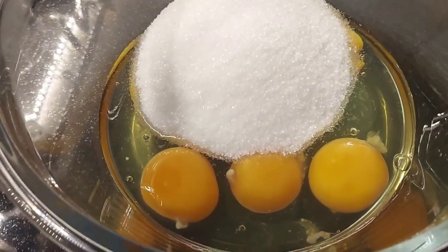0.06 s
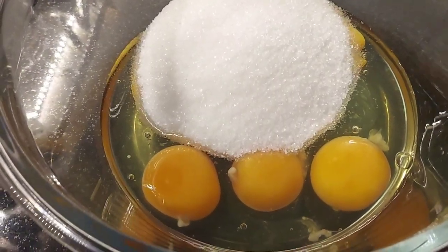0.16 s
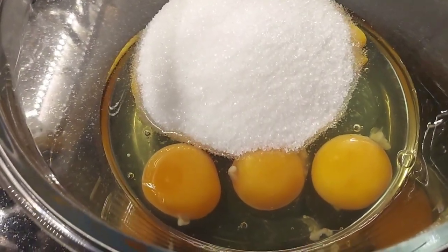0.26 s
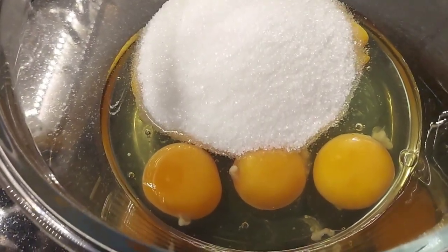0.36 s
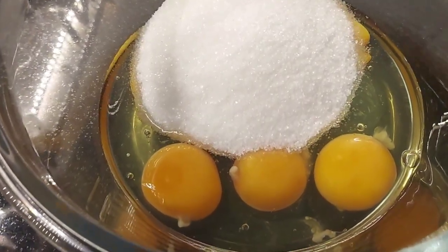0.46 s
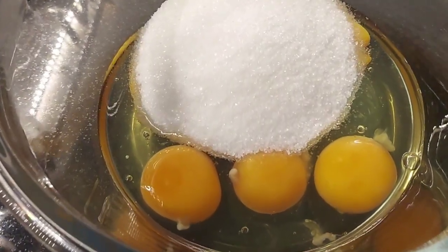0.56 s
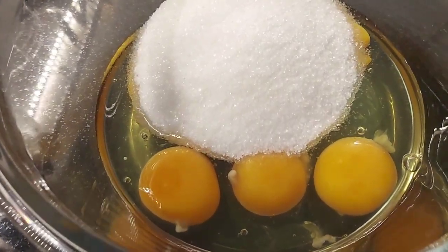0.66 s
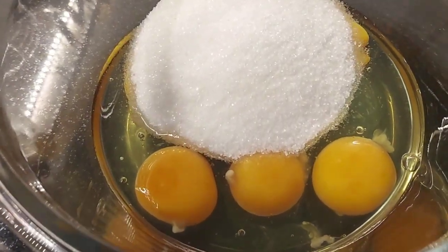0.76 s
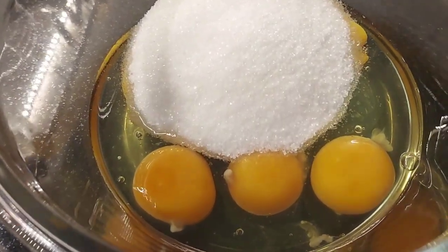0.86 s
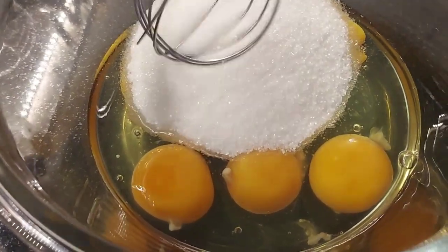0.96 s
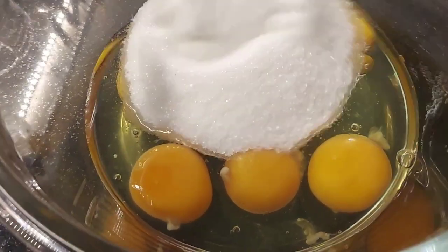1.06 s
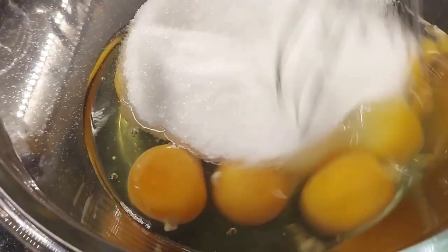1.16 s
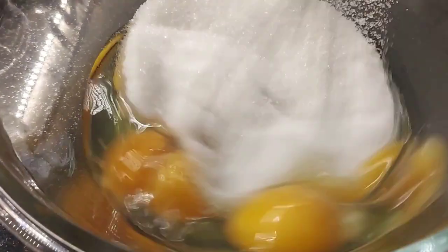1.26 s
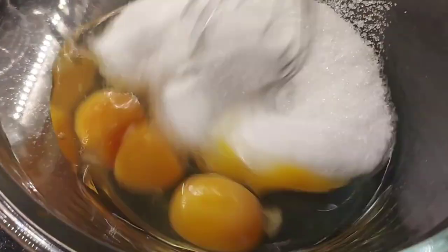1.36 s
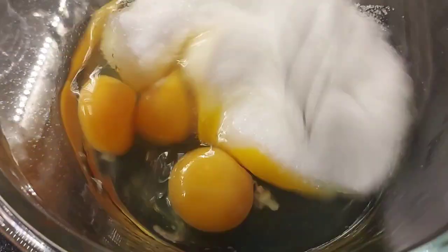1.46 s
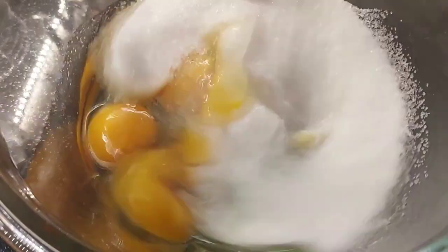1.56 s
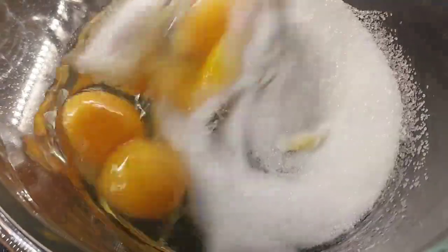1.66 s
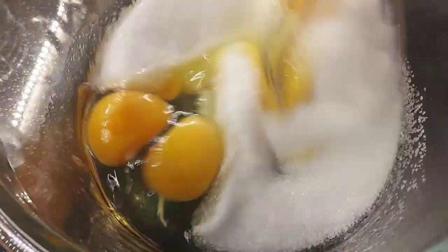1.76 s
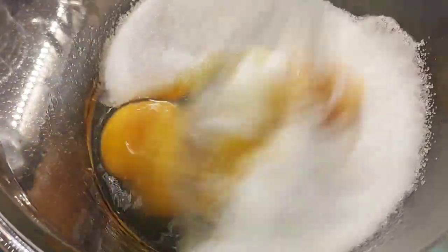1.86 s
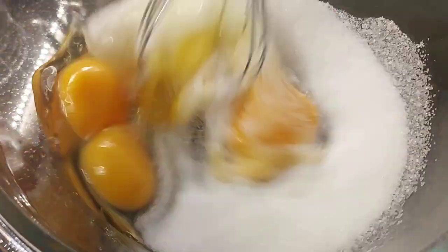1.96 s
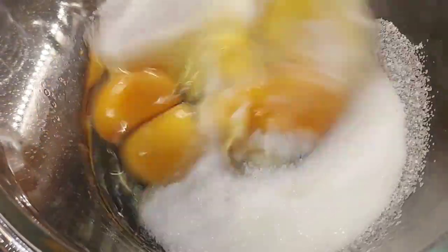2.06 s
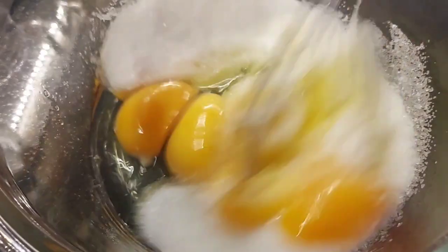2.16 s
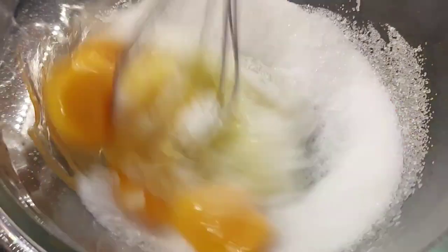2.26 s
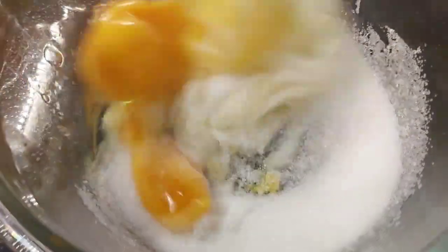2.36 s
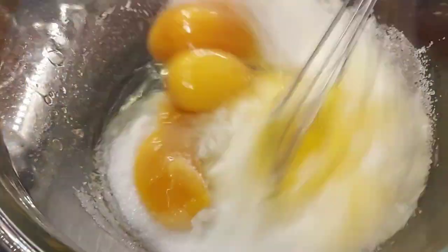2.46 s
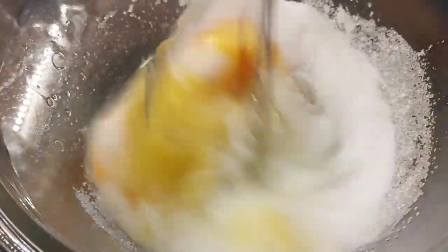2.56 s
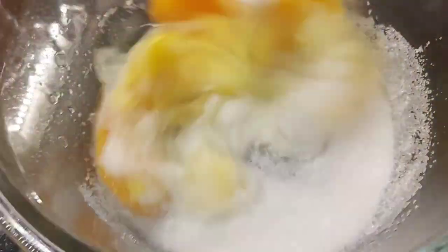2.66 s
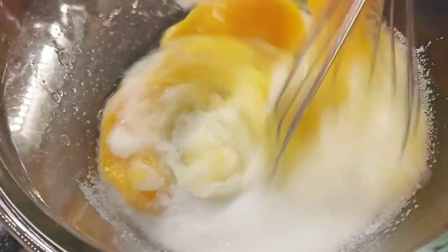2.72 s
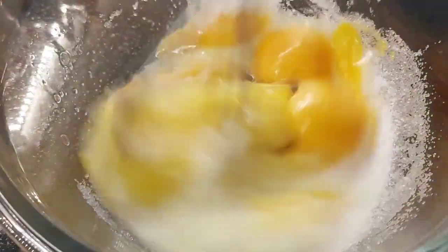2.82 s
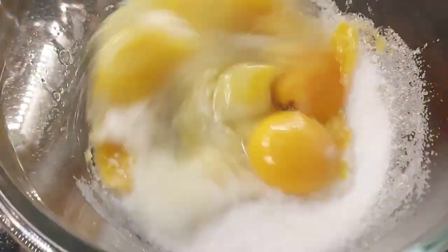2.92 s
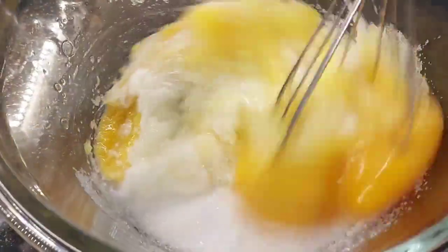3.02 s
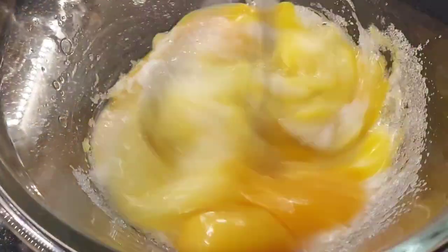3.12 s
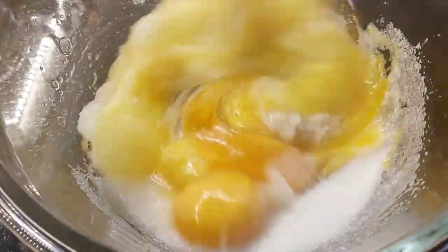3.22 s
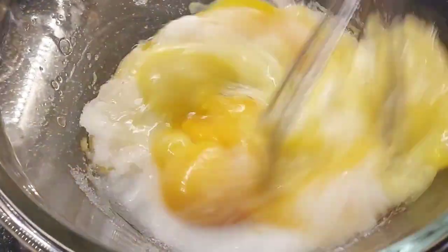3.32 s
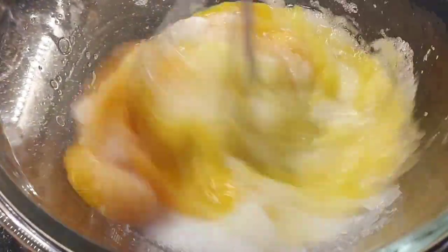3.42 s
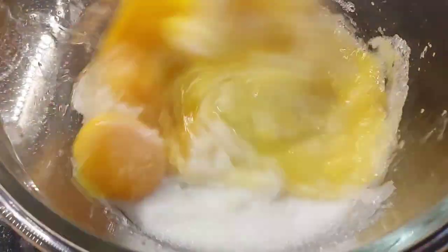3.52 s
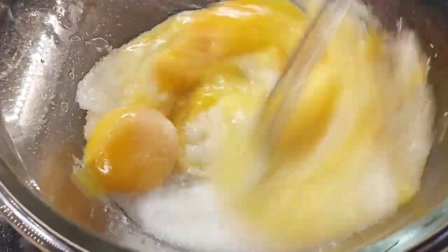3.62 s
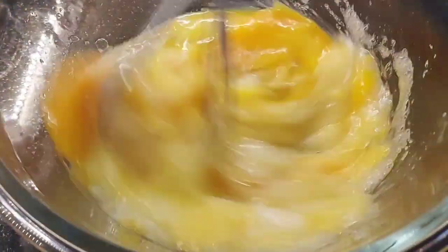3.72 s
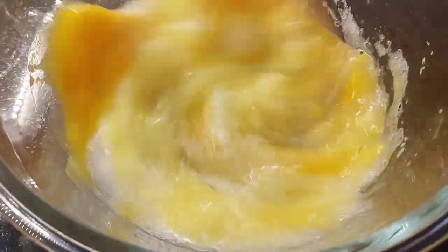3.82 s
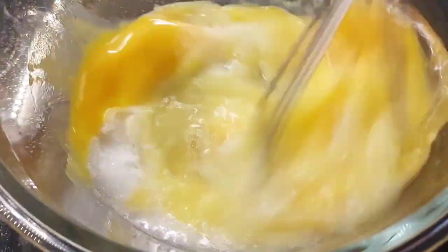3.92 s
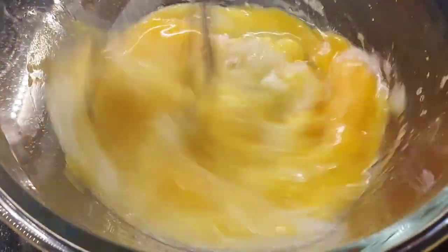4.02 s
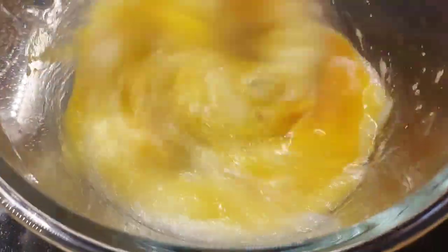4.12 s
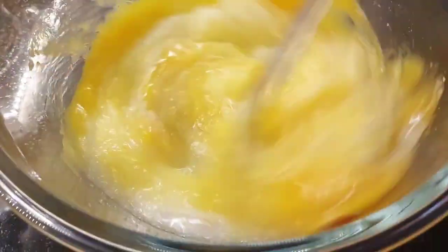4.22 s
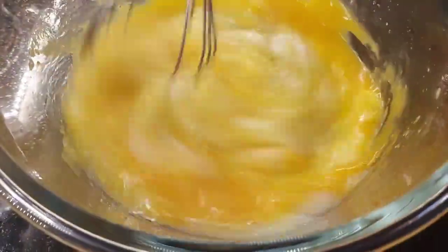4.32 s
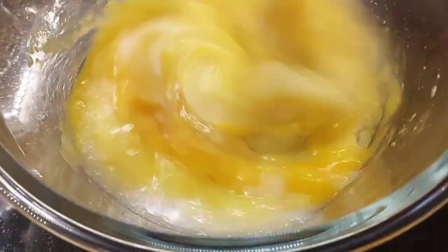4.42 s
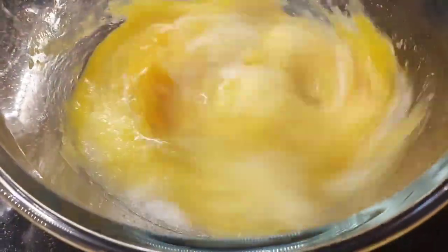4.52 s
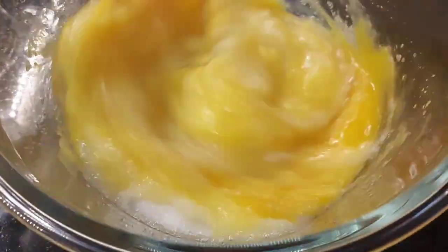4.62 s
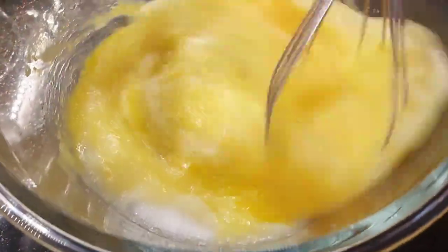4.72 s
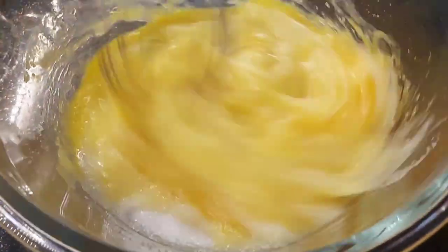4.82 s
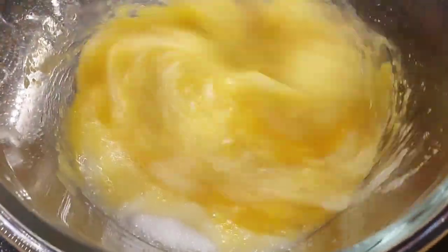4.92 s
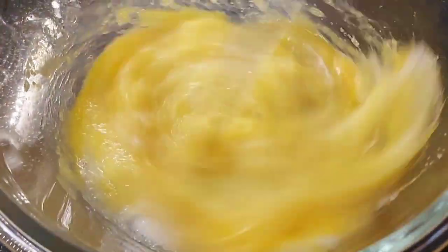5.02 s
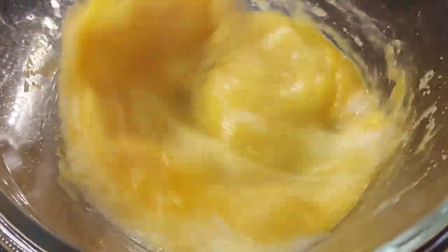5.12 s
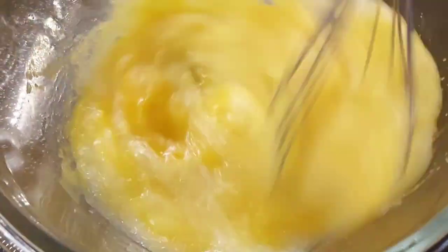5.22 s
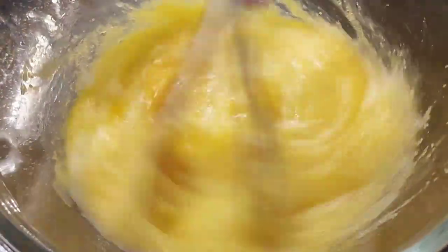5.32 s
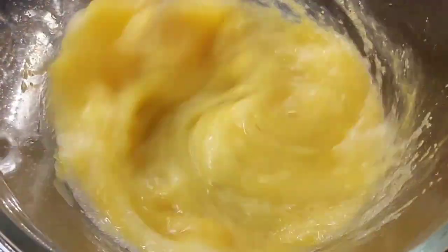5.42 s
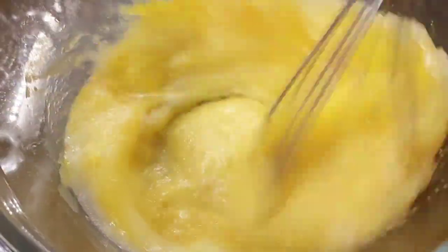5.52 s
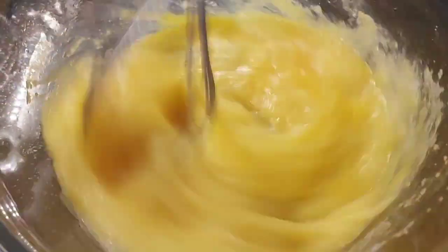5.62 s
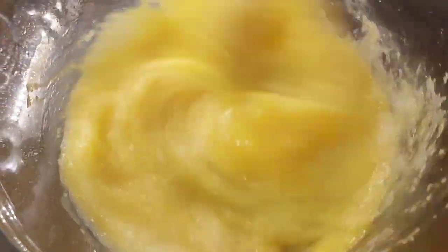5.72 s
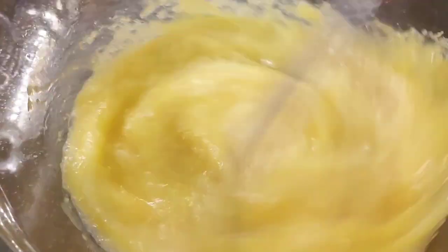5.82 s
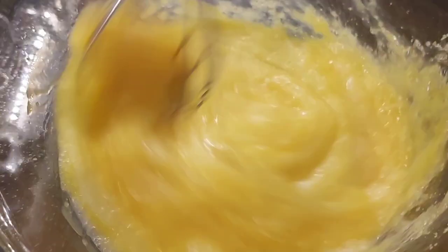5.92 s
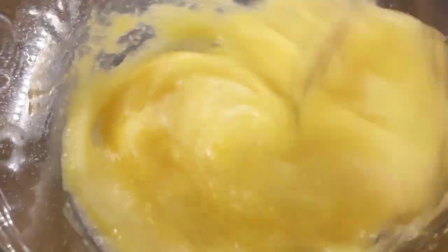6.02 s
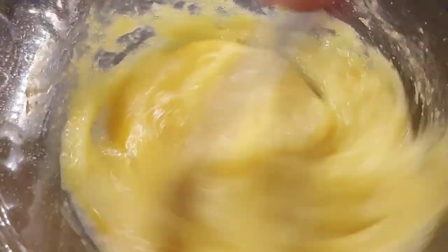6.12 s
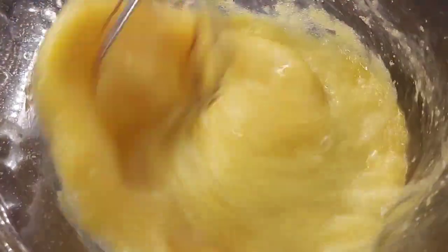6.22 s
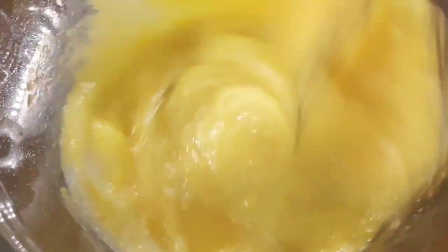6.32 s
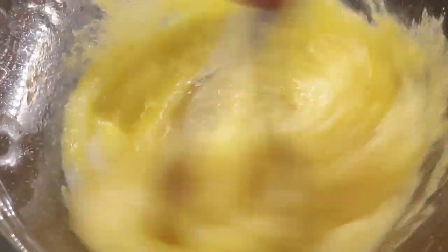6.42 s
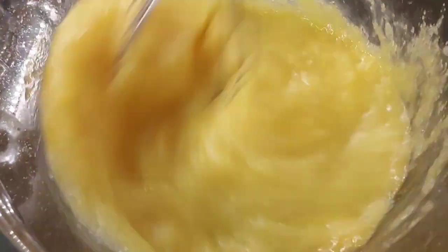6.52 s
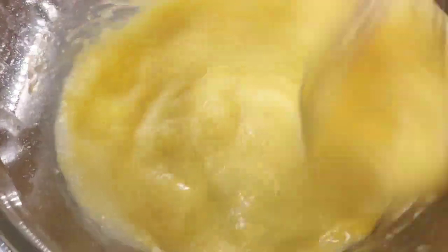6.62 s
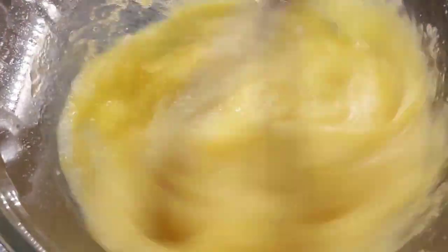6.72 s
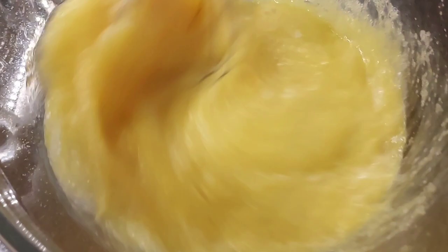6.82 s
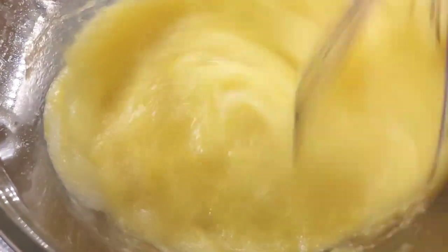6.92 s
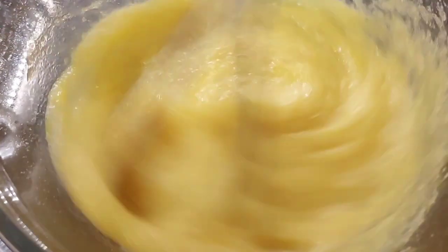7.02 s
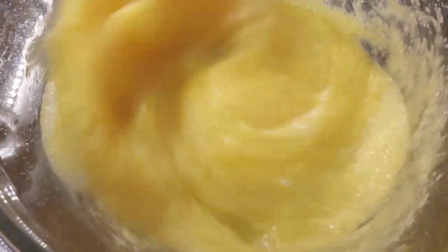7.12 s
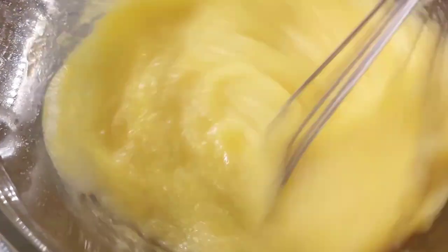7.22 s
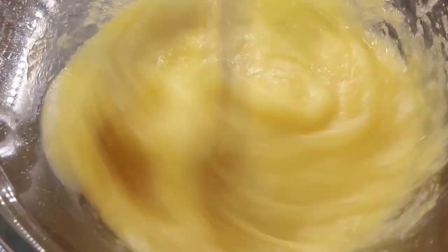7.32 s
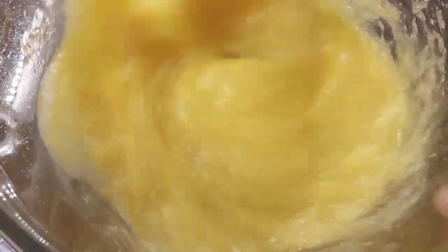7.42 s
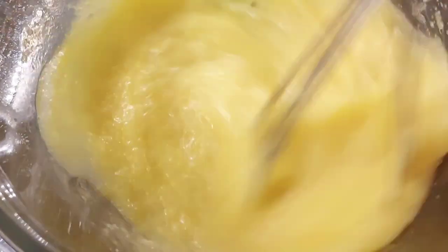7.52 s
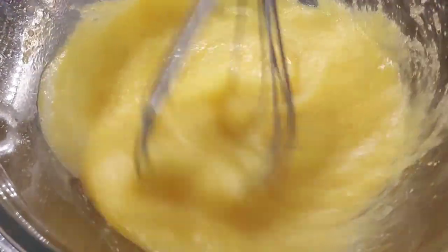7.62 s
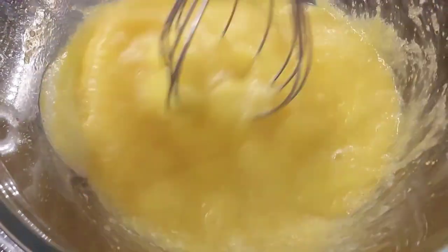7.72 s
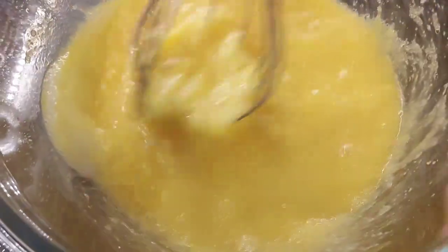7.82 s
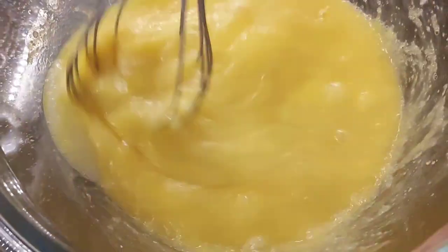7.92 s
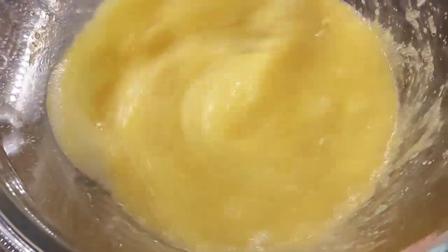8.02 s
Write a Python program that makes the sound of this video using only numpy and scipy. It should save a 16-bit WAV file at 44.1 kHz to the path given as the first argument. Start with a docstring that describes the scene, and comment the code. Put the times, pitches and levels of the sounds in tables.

```python
"""Kitchen counter: a wire whisk beats eggs and sugar in a thick glass bowl, close to a spaced pair of microphones.
Random grain contacts, swelling with each sweep, give the grind; short decaying bursts of them give the wire clatter.
Resonators and decaying tones ring the bowl; dry sugar hisses as filtered noise; short upward-gliding tones give
pops, thuds and snaps in the bowl. Low noise bands and tones shake the counter; a diffuse noise tail and quiet
coloured noise make the room."""
import sys
import numpy as np
from scipy import signal
from scipy.fft import rfft, irfft
from scipy.io import wavfile

SR = 44100
rng = np.random.default_rng(int(sys.argv[2]) if len(sys.argv) > 2 else 0)


def store_pcm(level_fs):
    """Save levels as 16-bit WAV."""
    pcm = np.round(np.clip(level_fs, -1, 1) * 32767).astype(np.int16)
    wavfile.write(sys.argv[1], SR, np.atleast_2d(pcm).T)


def linear_from_db(decibels):
    """Turn decibels (scalar or array-like) into linear amplitude factors; 0 gives 1."""
    return 10 ** (np.asarray(decibels, float) / 20)


N = 355887  # samples

# wires meeting the wall, before the offsets below: start_s, level_1200_5000hz_db, level_above_db,
# t60_s (held to 0.005-0.25), ring_re_mid_db
CLATTER = [(0.4, -54.5, -61, 0.03, -5), (1.126, -57, -40, 0.036, -7), (1.142, -44, -40, 0.062, 7),
           (1.186, -37.5, -31, 0.1, 4), (1.214, -36.5, -33, 0.02, -2), (1.5896, -33.5, -31, 0.093, 1.5),
           (1.675, -35.5, -40, 0.053, -19), (1.8996, -33.5, -42, 0.049, -3.5),
           (1.9065, -28.5, -31.5, 0.03, -8), (2.274, -30, -31.5, 0.051, -7),
           (2.356, -32.5, -32.5, 0.012, -6), (2.4809, -37.5, -30, 0.039, 6),
           (2.518, -30.5, -31, 0.042, -2.5), (2.561, -40, -43, 0.043, 1.5), (2.605, -38, -36.5, 0.031, 4),
           (2.7913, -31, -38, 0.05, -5.5), (2.894, -25.5, -26.5, 0.044, 2.5),
           (3.002, -23.5, -33, 0.018, -31), (3.0396, -37, -34.5, 0.11, -25), (3.356, -39.5, -39, 0.058, 5),
           (3.368, -28, -24, 0.014, -8), (3.38, -23.5, -30.5, 0.028, -13),
           (3.571, -26.5, -31.5, 0.027, -14), (3.596, -37, -38.5, 0.027, -4),
           (3.675, -23.5, -26.5, 0.057, -11), (3.695, -31.5, -34, 0.021, -2), (3.9468, -28, -32, 0.021, -2),
           (4.008, -24.5, -25, 0.08, -5), (4.156, -44.5, -35, 0.016, -14), (4.2099, -29, -32, 0.012, -14),
           (4.237, -30, -36, 0.064, -9), (4.259, -26, -30, 0.014, -19), (4.2846, -21.5, -22, 0.046, -11),
           (4.3223, -34.5, -38, 0.031, -7), (4.495, -33, -46.5, 0.028, -8.5), (4.509, -30, -32.5, 0.073, 1),
           (4.5438, -27.5, -35, 0.047, -4), (4.5645, -27.5, -26.5, 0.11, 5),
           (4.702, -29.5, -34, 0.071, -12), (4.7355, -33, -34, 0.2, -5.5), (4.7721, -27, -33.5, 0.051, 2),
           (4.811, -29, -29.5, 0.061, -8), (4.8235, -24.5, -33, 0.051, 0), (4.83, -24, -21, 0.041, -1.5),
           (4.958, -25, -35, 0.026, -7.5), (4.9734, -27.5, -26.5, 0.042, 1),
           (4.9833, -24.5, -24, 0.057, 2.5), (5.0118, -29, -34, 0.095, -1),
           (5.056, -16.5, -22, 0.026, -2.5), (5.0677, -23.5, -28, 0.055, 1.5), (5.073, -31, -26, 0.04, -12),
           (5.1656, -49, -35, 0.014, -6.5), (5.205, -27, -34, 0.02, -4), (5.2111, -15, -21.5, 0.021, -13),
           (5.2299, -25, -22.5, 0.053, 2), (5.2593, -20.5, -41, 0.015, -14),
           (5.2776, -45, -24.5, 0.015, -7), (5.2975, -26, -30, 0.029, -4), (5.3309, -28.5, -23, 0.059, 1.5),
           (5.362, -27, -31, 0.024, -2), (5.552, -31.5, -35, 0.026, -4), (5.5605, -31, -36, 0.015, -3),
           (5.573, -29.5, -29, 0.015, -8.5), (5.586, -27.5, -34, 0.012, -11),
           (5.6008, -17, -20.5, 0.055, 1), (5.6112, -21.5, -20, 0.031, 0.5), (5.657, -32, -32, 0.03, -11),
           (5.718, -41, -36, 0.026, -2), (5.776, -35.5, -32.5, 0.021, -7),
           (5.7991, -26.5, -25.5, 0.014, -13), (5.822, -24, -25, 0.018, -6), (5.8645, -26, -33, 0.031, -15),
           (5.8768, -23, -18, 0.022, -3.5), (5.883, -17.5, -16.5, 0.029, -7.5),
           (6.0104, -40, -40, 0.086, 4), (6.0661, -32, -43, 0.0098, -3), (6.08, -29, -32.5, 0.026, -9),
           (6.104, -45, -37, 0.02, -8), (6.123, -27, -38, 0.015, 0), (6.1327, -25.5, -48, 0.0044, 3),
           (6.1406, -24, -19.5, 0.078, 3), (6.2147, -33, -34.5, 0.028, 0), (6.266, -40, -45, 0.047, 2),
           (6.308, -43.5, -41, 0.027, 7), (6.362, -37, -31, 0.033, -12), (6.3683, -22.5, -34, 0.02, -2),
           (6.425, -14, -22, 0.028, -7), (6.4315, -18, -22.5, 0.08, -5), (6.4918, -25.5, -25.5, 0.047, -5),
           (6.541, -35, -34, 0.021, 3), (6.668, -31.5, -36, 0.023, -3), (6.6911, -28.5, -32.5, 0.032, -7),
           (6.7254, -24, -20, 0.017, -1), (6.7347, -27, -39, 0.022, -3), (6.7516, -23, -21.5, 0.032, 3),
           (6.8043, -29, -30.5, 0.044, -7), (6.873, -40, -37, 0.047, 4), (6.9906, -35, -34.5, 0.025, -5),
           (7.007, -25.5, -30.5, 0.032, -6), (7.0232, -29, -30, 0.14, 5), (7.145, -37.5, -48, 0.037, -3),
           (7.1622, -29, -34, 0.026, -1.5), (7.22, -27.5, -33.5, 0.04, -14), (7.24, -24.5, -30.5, 0.029, 2),
           (7.2603, -25.5, -34, 0.041, 2), (7.274, -32, -27, 0.014, -6), (7.295, -32.5, -34, 0.05, -12),
           (7.314, -19, -21.5, 0.072, -0.5), (7.448, -29, -32, 0.029, -9), (7.4821, -30.5, -29, 0.041, -4),
           (7.577, -29, -34.5, 0.065, -8), (7.6044, -20, -22.5, 0.073, -16), (7.8266, -58, -69, 0.066, 0),
           (7.9498, -61, -77, 0.035, -11)]
# burst offsets: mid_db, low_db, high_db, ring_db
RATTLE_OFFSETS = [-3, -9.5, 0.5, -14]
# first-strike offsets: mid_db, low_db, high_db, ring_db
STRIKE_OFFSETS = [6.5, 2, 16, 9]
CLATTER_BASS_RE_MID_DB = -6.5
LEAD_IN_RE_RATTLE_DB, LEAD_IN_SWELL_60DB_S = -15, 0.022

# handling before the whisk goes in: time_s, level_1200_5000hz_db, level_below_db, level_above_db
RUSTLE = [(0.0, -100, -43, -70), (0.05, -77, -55.5, -72), (0.12, -68.5, -67.5, -72),
          (0.34, -72, -100, -72.5), (0.45, -79, -87, -78), (0.56, -99, -87, -80), (0.75, -76, -91, -82),
          (0.85, -65, -72, -66), (0.93, -78, -100, -78.5), (1.04, -91, -91, -92)]
# sugar dragged round between sweeps, then dripping off the lifted whisk:
# time_s, level_1200_5000hz_db, level_below_db, level_above_db
STIR = [(1.071, -61, -80.5, -50.5), (1.13, -57, -76, -49.5), (1.36, -66, -80, -57), (2.0, -61, -81, -55),
        (2.2, -49.5, -65, -51.5), (2.6, -53.5, -56.5, -53), (3.6, -49, -55, -48), (4.4, -60, -66.5, -60),
        (5.5, -49.5, -52, -50), (5.95, -58, -57, -70), (6.3, -43.5, -49, -44), (6.6, -58.5, -58.5, -56.5),
        (6.9, -45, -51, -45), (7.1, -74, -72, -58), (7.6, -55, -52.5, -65), (7.75, -79, -81, -77),
        (8.07, -67.5, -74, -68)]
# wires pressed along the wall: peak_s, level_1200_5000hz_db, swell_20db_s, fade_20db_s (both at least 0.01),
# bass_re_mid_db
SWEEPS = [(1.212, -41, 0.12, 0.08, -7), (1.592, -48.5, 0.45, 0.4, -17), (1.901, -44.5, 0.11, 0.13, -9),
          (2.292, -46, 0.35, 0.04, -5), (2.52, -42, 0.29, 0.43, -9.5), (2.787, -40.5, -0.01, 0.26, -5),
          (3.139, -41, 0.24, 0.09, -8), (3.379, -43, 0.24, 0.38, -9), (3.689, -38, 0.15, 0.18, -9),
          (3.943, -40, 0.04, 0.26, -6), (4.144, -39, 0.09, -0.14, -7.5), (4.302, -37.5, 0.21, 0, -5),
          (4.571, -37, 0.16, 0.03, -7), (4.836, -41.5, 0.09, 0.04, -1), (5.22, -46, 1, -0.2, -6),
          (5.329, -32.5, 0.08, 0.12, -13), (5.609, -41.5, 0.1, 0.14, -2.5), (5.87, -44, 0.95, -0.13, -9),
          (6.15, -37.5, 0.23, 0.09, -12), (6.442, -35, 0.05, 0.2, -6), (6.749, -33.5, 0.1, 0.04, -15),
          (7.032, -36, 0.14, 0.08, -8), (7.169, -46, 0.1, 0.34, -4.5), (7.33, -35, 0.09, 0.04, -3.5),
          (7.48, -52, 0.3, 0.29, -3.5), (7.626, -41, 0.42, -0.005, -9.5)]
SWEEP_TREBLE_RE_MID_DB, GRIND_RING_RE_MID_DB = -0.6, -14.5

# colour of the contact: freq_hz, density_db_per_hz
CONTACT_SPECTRUM = [(120, -41), (250, -2.5), (500, -1.5), (1000, 1.5), (2000, -2), (3500, -4.5), (5100, 2),
                    (6500, 7.5), (10000, -1.5), (15500, -3.5), (16500, -58)]
# bowl modes under the scraping wires, before the shared gain: freq_hz, width_hz, level_db
BOWL_MODES = [(582, 8.5, -6.5), (752, 26, -9.5), (987, 170, -10.5), (1320, 260, -4.5), (2578, 16, -8),
              (4008, 50, -4), (1428, 35, -5), (6400, 470, -5), (7440, 120, -7), (12500, 680, -8.5)]

# loose dry sugar: freq_hz, density_db_per_hz
SUGAR_SPECTRUM = [(800, -40), (2000, -14), (3700, -4), (5150, -17), (5700, -4), (6400, 1.5), (7600, -3),
                  (11000, -4), (15500, -4), (16500, -50)]
SUGAR_LIKENESS, SUGAR_RE_GRIND_DB = 0.31, -1.8
DRY_HALF_GONE_S, DRY_SHARE_MAX = 3.6, 0.9

# blows that ring clear: start_s, then level_db of each clear mode, low to high
CLEAR_BLOWS = [(1.129, -62, -58, -56, -55, -50), (1.144, -66, -54, -42.5, -46, -54),
               (1.186, -62, -50.5, -54, -52, -46), (1.208, -66, -57, -43, -59, -64),
               (1.594, -68, -59, -47.5, -44, -50), (2.171, -63, -53, -53, -46, -69),
               (2.463, -59, -50, -53, -42, -56.5), (3.039, -70, -60, -53, -40, -53),
               (4.285, -56, -54, -62, -34, -35), (4.566, -43, -43, -36.5, -31, -28.5),
               (4.831, -51, -50, -58, -34, -39), (5.074, -46, -57, -41, -37, -39),
               (5.278, -51.5, -61, -48, -32, -35), (5.611, -41, -51, -44, -28, -30),
               (5.657, -62, -61, -48, -49, -58.5), (5.884, -43.5, -51, -47, -37, -34),
               (6.141, -54, -37, -36, -29.5, -38), (6.432, -39.5, -41, -51, -37, -47),
               (6.492, -51, -45, -49, -35.5, -52), (6.544, -49, -52, -64, -45, -58),
               (6.726, -50, -34, -35, -33, -32), (7.242, -54, -49, -48, -41, -44),
               (7.315, -44, -33, -37, -47, -29), (7.544, -49, -45, -44, -51, -58),
               (7.607, -52, -52, -41, -34, -40), (7.633, -58, -44, -68, -54, -46.5)]
# clear modes: pitch_hz, bare_wall_t60_s, under_batter_t60_s
CLEAR_MODES = [(700, .25, .15), (1428, .25, .12), (2578, .3, .15), (4008, .2, .1), (5685, .2, .09)]
# random pitch spread of the later rings, blow to blow, for each clear mode: share of pitch
RING_DETUNE = [.04, .015, .003, .005, .003]
COATED_FROM_S = 2.0

# short pitched pops, thuds and snaps in the bowl: start_s, level_db, start_pitch_hz, t60_s
POPS = [(1.205, -44.5, 507, 0.072), (1.2635, -35, 3600, 0.028), (1.505, -42, 2080, 0.025),
        (1.9, -33, 3700, 0.03), (2.272, -45, 322, 0.05), (2.3562, -26, 3150, 0.007),
        (2.597, -39, 360, 0.041), (2.891, -34, 331, 0.06), (3.0031, -16, 1720, 0.014),
        (3.3318, -23, 1900, 0.011), (3.332, -26.5, 2750, 0.012), (3.572, -29, 2030, 0.018),
        (3.574, -29, 2700, 0.02), (4.1347, -16, 560, 0.009), (4.545, -26.5, 1470, 0.018),
        (4.7037, -26.5, 2640, 0.028), (4.704, -25.5, 3450, 0.019), (4.8535, -20.5, 520, 0.013),
        (5.2115, -20, 460, 0.006), (7.295, -27, 700, 0.033), (7.439, -35.5, 700, 0.042)]
# something set down on the counter: start_s, level_db, pitch_hz, t60_s
KNOCK = [(.004, -45, 1250, 0.1), (.004, -39, 995, 0.071), (.004, -54, 853, 0.13), (.004, -52, 1910, 0.098),
         (.01, -55, 2660, 0.49)]
MIC_LAG_SAMPLES = 4  # the left microphone hears the bowl later

# low sounds through the counter: time_s, hum_rms_db, rumble_db
COUNTER = [(0.0, -74, -71), (0.54, -74, -75.5), (1.1, -67.5, -74.5), (1.19, -65.5, -65.5),
           (3.26, -68.5, -62), (3.42, -65.5, -66), (4.23, -62.5, -67.5), (4.7, -66, -68.5),
           (4.96, -59, -64.5), (5.53, -69, -65.5), (5.77, -62.5, -69), (6.54, -67.5, -62),
           (8.07, -59.5, -71.5)]
# counter shaken by the stroke: start_s, level_db, start_pitch_hz, t60_s
SHAKES = [(2.61, -35, 42.2, 0.29), (2.91, -36, 43, 0.35), (3.2, -33, 41.4, 0.3)]
HUM_HZ, HUM_WIDTH_HZ = 177.3, 7.3

# room noise colour: freq_hz, density_db_per_hz (relative)
ROOM_SPECTRUM = [(12, -45), (20, -9.5), (60, -10), (86, -20), (305, -18), (634, -28), (750, -28.5),
                 (1280, -34), (3000, -36.5), (16500, -50.5)]
# room noise: freq_hz, left_right_likeness
ROOM_LIKENESS = [(60, 0.36), (950, 0.11), (15000, 0.05)]
ROOM_RMS_DB = -66
KITCHEN_T60_S, KITCHEN_RE_BOWL_DB = 0.32, -13.5


def rms_one(x):
    """Scale to unit rms."""
    return x / np.sqrt(np.mean(x ** 2) + 1e-20)


def drift(corner_hz):
    """Slow random wander of unit rms: noise through two equal poles, made at SR / 20."""
    r = np.exp(-40 * np.pi * corner_hz / SR)
    noise = rng.standard_normal(N // 20 + 2002)
    slow = signal.lfilter([1], [1, -2 * r, r * r], noise)[2000:]
    return np.interp(np.arange(N) / 20, np.arange(len(slow)), rms_one(slow))


def at_hz(points, hz):
    """Read a two-column table on a log frequency axis."""
    table_hz, value = np.transpose(points)
    return np.interp(np.log(np.maximum(hz, 1)), np.log(table_hz), value)


def colour(x, spectrum):
    """Causal minimum-phase filter, built from the folded cepstrum of the spectrum."""
    log_gain = at_hz(spectrum, np.linspace(0, SR / 2, 2049)) * np.log(10) / 20
    cepstrum = irfft(log_gain)
    cepstrum[1:2048] *= 2
    cepstrum[2049:] = 0
    impulse = irfft(np.exp(rfft(cepstrum)))[None, :2048]
    return signal.oaconvolve(x, impulse)[:, :N]


def filtered(x, edges_hz, kind):
    """Second-order Butterworth filter."""
    return signal.sosfilt(signal.butter(2, edges_hz, kind, fs=SR, output="sos"), x)


def resonance(x, hz, width_hz):
    """Two-pole resonance, gain 1 on top."""
    r = np.exp(-np.pi * width_hz / SR)
    poles = [1, -2 * r * np.cos(2 * np.pi * hz / SR), r * r]
    return signal.lfilter([(1 - r * r) / 2, 0, (r * r - 1) / 2], poles, x)


def grains(per_s, spread_db):
    """Random clicks of very uneven size and either sign, rms 1."""
    sizes = linear_from_db(spread_db * np.minimum(rng.exponential(1, N), 5)) * rng.choice([-1, 1], N)
    return rms_one(sizes * (rng.random(N) < per_s / SR))


def struck(rows, rise_s, glide):
    """Decaying tones; pitch glides by a share of 2 * glide over each t60."""
    out = np.zeros(N)
    for start_s, level_db, hz, t60_s in rows:
        i = round(start_s * SR)
        t = np.arange(int(SR * t60_s)) / SR
        envelope = linear_from_db(level_db - 60 * t / t60_s) * (1 - np.exp(-t / rise_s))
        out[i:i + len(t)] += envelope * np.sin(2 * np.pi * hz * t * (1 + glide * t / t60_s))
    return out


def lag_left(x, samples):
    """Stereo pair from one signal, left later."""
    return np.array([np.roll(x, samples), x])


def whisk():
    """Grain contacts and wire strikes, heard directly in three bands and through the bowl modes."""
    env, strikes, dry_high = contact_envelopes()
    touch = grains(per_s=7000, spread_db=4.5) + 0.3 * rng.standard_normal(N)
    mid, low, high, ring = touch * env + strikes
    reference, low, mid, high = colour(np.array([touch, low, mid, high]), CONTACT_SPECTRUM)
    contact = 0
    for x, edges_hz, kind in [(low, [220, 1200], "band"), (mid, [1200, 5000], "band"), (high, 5000, "high")]:
        # steady touch would have rms 1 in each band
        contact = contact + filtered(x, edges_hz, kind) / np.std(filtered(reference, edges_hz, kind))
    direct = two_ears(contact, mean_lag=MIC_LAG_SAMPLES, lag_swing=2.5, slap_db=-11)
    return direct + bowl_ring(ring) + sugar_hiss(dry_high)


def contact_envelopes():
    """Grind and clatter strength (mid, low, high, ring), first strikes, and the dry sugar's treble strength."""
    mid, low, high = grind_levels()
    # single wires tick on the glass
    tick_decay = linear_from_db(-60 / (0.01 * SR))
    ticks = signal.lfilter([1], [1, -tick_decay], np.abs(grains(per_s=140, spread_db=4.5)) * 0.05)
    bare = 1 - dryness()
    uneven = linear_from_db(2.0 * bare * drift(21.0)) * (0.95 + bare * ticks)  # wires catch and slip
    env = np.array([mid, low, high * np.sqrt(bare), mid * linear_from_db(GRIND_RING_RE_MID_DB)]) * uneven
    strikes = np.zeros((4, N))
    lead_s = np.arange(int(SR * LEAD_IN_SWELL_60DB_S), 0, -1) / SR
    for start_s, mid_db, high_db, t60_s, ring_db in CLATTER:
        i, t60_s = round(start_s * SR), np.clip(t60_s, .005, .25)
        t = np.arange(min(N - i, int(SR * t60_s))) / SR
        level_db = np.array([mid_db, mid_db + CLATTER_BASS_RE_MID_DB, high_db, mid_db + ring_db])
        rattle_db = (level_db + RATTLE_OFFSETS)[:, None]
        rise = 1 - np.exp(-(t / (0.025 * t60_s)) ** 2)
        env[:, i:i + len(t)] += linear_from_db(rattle_db - 60 * t / t60_s) * rise
        # neighbouring wires brush the wall just before
        lead_db = rattle_db + LEAD_IN_RE_RATTLE_DB - 60 * lead_s / LEAD_IN_SWELL_60DB_S
        env[:, i - len(lead_s):i] += linear_from_db(lead_db)
        strikes[:, i + 8] += linear_from_db(level_db + STRIKE_OFFSETS)
    return env, strikes, high * np.sqrt(1 - bare)


def grind_levels():
    """Mid, low and high grind strength: rustle, then stirring, with sweeps adding power as they swell and fade."""
    t = np.arange(N) / SR
    time_s, *levels_db = np.transpose(RUSTLE + STIR)
    power = np.array([linear_from_db(2 * np.interp(t, time_s, db)) for db in levels_db])
    whisking = t > STIR[0][0]
    for peak_s, mid_db, swell_s, fade_s, bass_db in SWEEPS:
        swell_s, fade_s = max(swell_s, .01), max(fade_s, .01)
        i, j = int(max(peak_s - 2 * swell_s, 0) * SR), int((peak_s + 2 * fade_s) * SR)
        from_peak_s = t[i:j] - peak_s
        press_db = mid_db - 20 * np.maximum(-from_peak_s / swell_s, from_peak_s / fade_s)
        bands_db = press_db + np.array([[0], [bass_db], [SWEEP_TREBLE_RE_MID_DB]])
        power[:, i:j] += linear_from_db(2 * bands_db) * whisking[i:j]
    return np.sqrt(power)


def two_ears(x, mean_lag, lag_swing, slap_db):
    """The contact circles the bowl: lag and early slaps off wall and counter change from place to place."""
    places, t = 12, np.arange(500) / SR
    angle = np.cumsum(3.4 + 2.0 * drift(3.013)) / SR * places  # wandering, mean 3.4 laps/s
    out = np.zeros((2, N + len(t) + 40))
    for k in range(places):
        distance = (angle - k + places / 2) % places - places / 2
        nearness = np.cos(np.pi / 2 * np.clip(distance, -1, 1))
        slap_envelope = linear_from_db(slap_db - 60 * t / 0.017) * np.minimum(t / 0.0002, 1)
        slaps = rng.standard_normal((2, len(t))) * slap_envelope
        slaps = signal.lfilter([1, -1], [1, -.9], slaps)  # long waves reach both microphones alike
        slaps[:, 0] = 1
        slaps /= np.sqrt(np.sum(slaps ** 2, axis=1, keepdims=True))
        heard = signal.oaconvolve((x * nearness)[None], slaps, axes=1)
        lag = int(np.clip(20 + mean_lag + lag_swing * np.sin(2 * np.pi * k / places), 0, 40))
        out[0, lag:lag + heard.shape[1]] += heard[0]
        out[1, 20:20 + heard.shape[1]] += heard[1]
    return rms_one(out[:, 20:20 + N]) * np.std(x)


def bowl_ring(drive):
    """Bowl modes as resonators; the moving contact meets nodes and bellies, lobes swing between microphones."""
    glass = np.zeros((2, N))
    early = np.exp(-np.maximum(np.arange(N) / SR - 1.2, 0) / 0.39)
    for hz, width_hz, level_db in BOWL_MODES:
        early_db = 8 * np.exp(-(np.log(hz / 3100) / 0.4) ** 2)  # early ringing is stronger around 3 kHz
        strength = linear_from_db(level_db + early_db * early + 19.5 + 3.96 * drift(12.5))
        sway = linear_from_db(2.0 * drift(11.4))
        left = resonance(drive * strength * sway, hz, width_hz)
        right = resonance(drive * strength / sway, hz, width_hz)
        lag = int(min(hz / 1500, 1) * SR / hz / 4)  # quarter cycle above 1500 Hz
        glass += [np.roll(left, lag), right]
    return glass


def dryness():
    """Share of the grind running through loose dry sugar, falling along a logistic curve."""
    return DRY_SHARE_MAX / (1 + np.exp((np.arange(N) / SR - DRY_HALF_GONE_S) / 0.5))


def sugar_hiss(level):
    """Countless dry grains sliding all over the bowl: fine, even, wide, partly shared noise."""
    common = rng.standard_normal(N) + 0.85 * grains(per_s=4000, spread_db=7.0)
    apart = rng.standard_normal((2, N))
    shared = np.sqrt(SUGAR_LIKENESS) * lag_left(common, MIC_LAG_SAMPLES)
    hiss = colour(shared + np.sqrt(1 - SUGAR_LIKENESS) * apart, SUGAR_SPECTRUM)
    return linear_from_db(SUGAR_RE_GRIND_DB) * level * rms_one(hiss)


def clear_rings():
    """Blows leave pure decaying modes, long on the bare wall, short under batter; later pitches vary by blow."""
    shifts = 1 + rng.standard_normal((len(CLEAR_BLOWS), len(CLEAR_MODES))) * RING_DETUNE
    rows = []
    for (start_s, *levels_db), blow_shifts in zip(CLEAR_BLOWS, shifts):
        for level_db, shift, (hz, bare_t60_s, coated_t60_s) in zip(levels_db, blow_shifts, CLEAR_MODES):
            if start_s < COATED_FROM_S:
                rows.append((start_s, level_db, hz, bare_t60_s))
            else:
                rows.append((start_s, level_db, hz * shift, coated_t60_s))
    return struck(rows, rise_s=0.00061, glide=0)


def bowl_pops():
    """Short pitched pops, thuds and snaps: decaying tones gliding slightly upward, bass cut below 180 Hz."""
    return filtered(struck(POPS, rise_s=0.0005, glide=0.1), 180, "high")


def counter_knock():
    """Something set down on the counter: decaying modes at fixed pitch."""
    return struck(KNOCK, rise_s=0.00087, glide=0)


def counter_rumble():
    """Wavering narrow-band hum, lumpy bass noise and a few clear wobbles falling in pitch."""
    time_s, *levels_db = np.transpose(COUNTER)
    hum_db, rumble_db = [np.interp(np.arange(N) / SR, time_s, db) for db in levels_db]
    hum = resonance(rng.standard_normal(N), HUM_HZ, HUM_WIDTH_HZ)
    # part-levelled: wavers less than plain noise would
    hum = rms_one(hum / (np.abs(signal.hilbert(hum)) + 0.4 * np.std(hum)))
    lumps = rms_one(filtered(rng.standard_normal(N), [45, 150], "band"))
    wobbles = struck(SHAKES, rise_s=0.027, glide=-.05)
    return linear_from_db(hum_db) * hum + linear_from_db(rumble_db + 2.0 * drift(6.2)) * lumps + wobbles


def kitchen(x):
    """Diffuse tail, its own in each channel, duller as it dies."""
    t = np.arange(int(SR * .4)) / SR
    noise = rng.standard_normal((2, len(t)))
    dull = signal.lfilter([.3], [1, -.7], noise)
    tail = dull * linear_from_db(-60 * t / KITCHEN_T60_S) + noise * linear_from_db(-100 * t / KITCHEN_T60_S)
    tail *= np.minimum(t / 0.0088, 1)
    return signal.oaconvolve(x, tail / np.sqrt(np.sum(tail ** 2) / 2), axes=1)[:, :N]


def room_noise():
    """Rumble and hiss: coloured noise, more alike between channels in the bass."""
    mid, side = rfft(colour(rng.standard_normal((2, N)), ROOM_SPECTRUM))
    alike = np.clip(at_hz(ROOM_LIKENESS, np.linspace(0, SR / 2, len(mid))), -1, 1)
    stereo = irfft(np.sqrt(1 + alike) * mid + np.sqrt(1 - alike) * side * [[1], [-1]], N)
    return linear_from_db(ROOM_RMS_DB) * rms_one(stereo)


def scene():
    """Bowl sounds and knock with their kitchen tail, over counter and room noise."""
    tones = bowl_pops() + counter_knock()
    bowl = whisk() + lag_left(tones, MIC_LAG_SAMPLES) + lag_left(clear_rings(), MIC_LAG_SAMPLES // 2)
    direct = bowl * linear_from_db(np.array([[-.1], [.1]]))  # left, right dB
    return direct + linear_from_db(KITCHEN_RE_BOWL_DB) * kitchen(bowl) + counter_rumble() + room_noise()


def low_pass(x):
    """Removes everything above the highest recorded frequency."""
    return signal.sosfilt(signal.butter(12, 17130, fs=SR, output="sos"), x)


def record(dry):
    """Low-pass the mix: 40 dB down from 16400 Hz up."""
    mix = signal.sosfilt(signal.cheby2(10, 40, 16400, fs=SR, output="sos"), dry)
    return low_pass(mix)


dry = scene()
out = record(dry)
store_pcm(out)
```